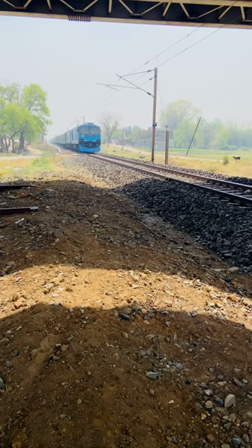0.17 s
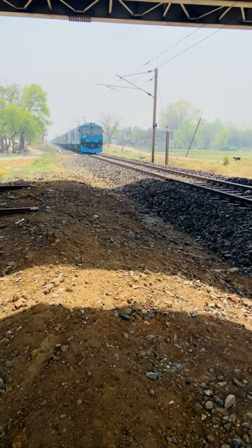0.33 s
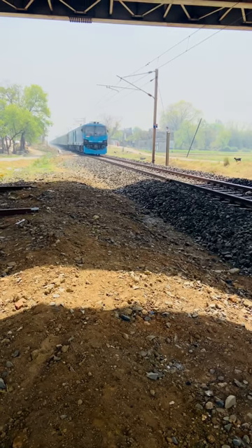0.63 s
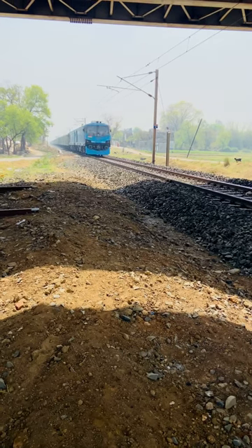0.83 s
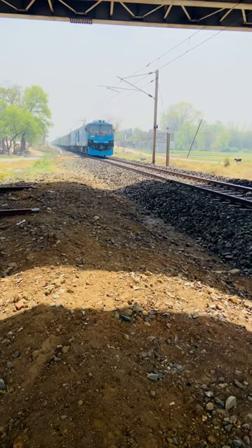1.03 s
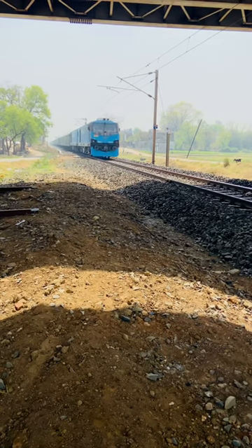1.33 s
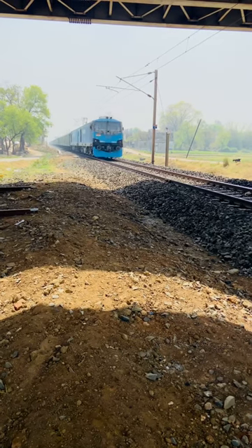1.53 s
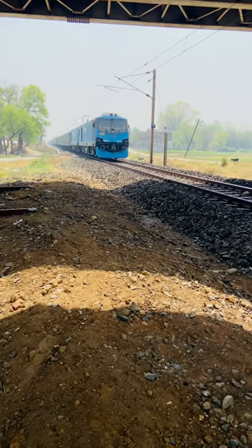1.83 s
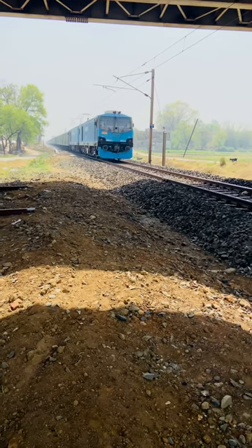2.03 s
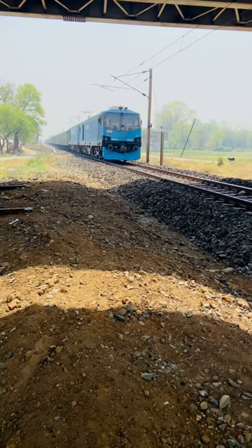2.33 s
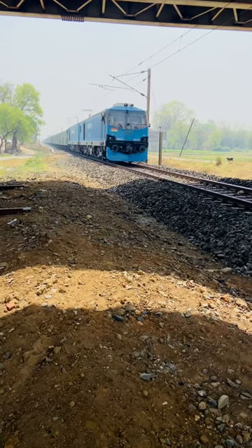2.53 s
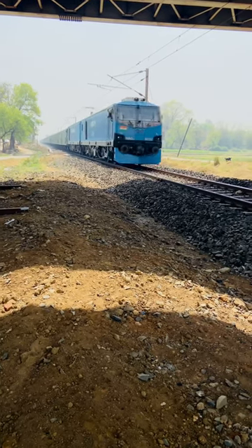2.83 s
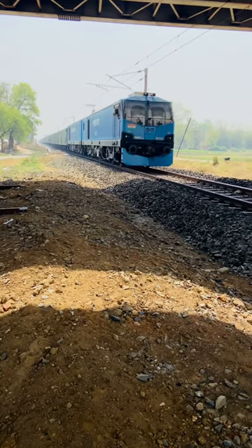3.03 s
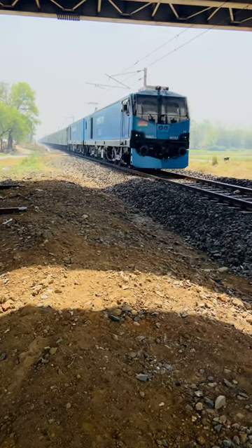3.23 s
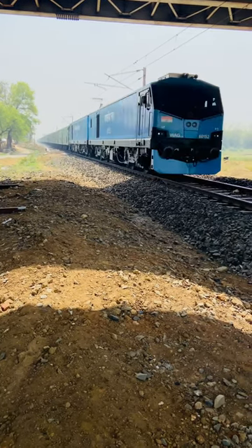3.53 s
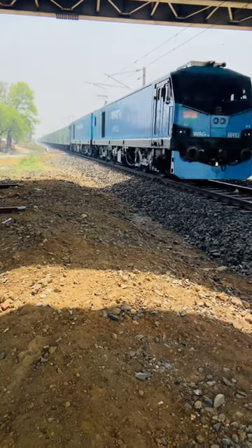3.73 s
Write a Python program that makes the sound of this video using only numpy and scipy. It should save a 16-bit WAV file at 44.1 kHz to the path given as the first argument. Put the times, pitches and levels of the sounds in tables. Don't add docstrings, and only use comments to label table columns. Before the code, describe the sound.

Electric freight train approaches, its low rumble, hum and wheel roar swelling to a close metallic bang.

```python
import sys
import numpy as np
from scipy import signal
from scipy.fft import rfft, irfft, next_fast_len
from scipy.io import wavfile
from scipy.ndimage import uniform_filter1d

SR = 44100
rng = np.random.default_rng(int(sys.argv[2]) if len(sys.argv) > 2 else 0)


def digitize_waveform(pressure):
    field = np.atleast_2d(pressure).T
    bounded = np.clip(field, -1, 1)
    quanta = np.round(bounded * 32767).astype(np.int16)
    wavfile.write(sys.argv[1], SR, quanta)


def boost(x):
    u = np.asarray(x, float) / 20
    return 10 ** u


N = 171549
T = np.arange(N) / SR
RING_SAMPLES = 8000


def evened(x):
    return x / np.sqrt(np.mean(x ** 2) + 1e-20)


def read(points, x, col=1):
    p = np.array(points, float)
    return np.interp(x, p[:, 0], p[:, col])


def readlog(points, hz):
    f, v = np.transpose(points)
    return np.interp(np.log(hz + 1), np.log(f + 1), v, left=v[0] - 30, right=v[-1] - 30)


def near(grow):
    # (time [s], level [dB])
    approach = [(0, -40.5), (.5, -36), (1.0, -33.5), (1.7, -31), (2.4, -29.5), (3.1, -26.5), (3.6, -23.5),
                (3.75, -20.5), (3.89, -19.5)]
    end_db = -22
    return boost(grow * (read(approach, T) - end_db))


def droop(grow):
    return 1 - 0.006 * near(grow)


def wash(shape, patch_db, flicker_db):
    frames, hz = N // 256 + 5, np.fft.rfftfreq(1024, 1 / SR)
    a, b, c, d, p = rng.standard_normal((frames, 513, 5)).T
    p = uniform_filter1d(p, size=10, axis=0)
    patches = evened(uniform_filter1d(p, size=12, axis=1))
    flicker = evened(uniform_filter1d(rng.standard_normal(frames), size=6))
    level_db = readlog(shape, hz)[:, None] + patch_db * patches + flicker_db * flicker
    z = np.array([a + 1j * b, c + 1j * d]) * boost(level_db)
    return evened(signal.istft(z, nperseg=1024, noverlap=768)[1][:, :N])


def fuzzy(hz, width_hz, clean=0):
    r = np.exp(-np.pi * abs(width_hz) * 1.5 * 32 / SR)
    slow_s = np.arange(N // 32 + 2) * 32 / SR
    shape = (2, len(slow_s) + 800)
    z = rng.standard_normal(shape) + 1j * rng.standard_normal(shape)
    z = signal.lfilter([1], [1, -2 * r, r * r], z)[:, 800:]
    z = z / abs(z) ** np.clip(clean, 0, 1)
    turn = np.exp(2j * np.pi * np.cumsum(hz * np.ones(N)) / SR)
    return evened(np.array([(np.interp(T, slow_s, v) * turn).real for v in z]))


def ring(hz, t60_s, rise_s):
    t = np.arange(RING_SAMPLES) / SR
    tone = np.sin(2 * np.pi * (hz * t + rng.random((2, 1))))
    return np.minimum(t / rise_s, 1) * boost(-60 * t / t60_s) * tone


def add(mix, s, sound):
    part = mix[:, round(s * SR):][:, :sound.shape[1]]
    part += sound[:, :part.shape[1]]


def hiss():
    # (frequency [Hz], density [dB per Hz])
    spectrum = [(4000, 2), (7000, -27), (11000, -2), (13500, -3), (15000, -32)]
    return boost(-56) * near(1.17) * wash(spectrum, patch_db=-3.5, flicker_db=0)


def bumps():
    # (time [s], level [dB], frequency [Hz])
    axle_loads = [(0.158, -26, 66.2), (0.41, -25.5, 78.1), (0.616, -33, 67.3), (0.918, -19.5, 154),
                  (1.181, -26, 150), (1.476, -30, 66), (1.708, -23, 68), (2.005, -19, 69.6),
                  (2.264, -28, 85), (3.549, -14, 207)]
    trim_db, cycles = -2.5, 4.15
    out = np.zeros((2, N))
    for s, db, hz in axle_loads:
        t = np.arange(0, cycles / hz, 1 / SR)
        swell = np.sin(np.pi * t * hz / cycles) ** 2
        tone = np.sin(2 * np.pi * (hz * t + rng.random((2, 1))))
        add(out, s, boost(db + trim_db) * swell * tone)
    return out


def rails():
    # (time [s], low tone level [dB], high tone level [dB])
    grip = [(0.0, -85, -70), (0.05, -48.5, -62), (0.43, -57, -47.5), (0.51, -52, -66), (0.71, -39, -57),
            (1.0, -48, -44.5), (1.96, -43, -52), (1.98, -46, -44), (2.43, -36.5, -47.5),
            (2.63, -48.5, -37.5), (2.76, -34, -49), (3.2, -36.5, -42.5), (3.24, -29, -43),
            (3.33, -46, -37.5), (3.73, -29.5, -47), (3.8, -41, -31), (3.86, -23.5, -53), (3.89, -42.5, -42)]
    pitch = droop(2.912)
    return sum(boost(read(grip, T, col=k)) * fuzzy(hz * pitch, 9.4, clean=0.5)
               for k, hz in enumerate((1757.5, 2041), 1))


def singing():
    # (frequency [Hz], width [Hz], level [dB])
    resonances = [(163.2, 22.4, -30.5), (195.1, 18.5, -32.5), (289.6, 22, -37), (405.5, 23.6, -35.5),
                  (486, 8.9, -40.5), (615, 8, -38.5), (655.4, 28, -39), (1014, 106, -33), (1729, 19, -40.5),
                  (2011, 80, -37), (2333, 17, -44), (2392, 36, -42.5), (2574, 14, -44), (3430, 50, -47.5),
                  (2794, 52, -45.5), (3026, 200, -46), (5250, 18, -58.5), (5300, 480, -51.5),
                  (6080, 100, -53.5)]
    pitch = droop(3.0)
    return near(1.004) * sum(boost(db) * fuzzy(hz * pitch, width_hz, clean=0.4)
                             for hz, width_hz, db in resonances)


def clink_modes(centre_hz):
    # (frequency [Hz], level [dB], t60 [s])
    wheel_modes = [(3050, 0, .15), (4250, 2, .09), (4925, 0.5, .25), (5190, -4, .15), (5990, -3, .3),
                   (7200, -4, .25), (8700, -3, .06), (9286, 0.5, .15), (9760, -6, .15), (10770, -2, .25),
                   (11300, -6, .12), (11880, -5, .15), (12500, -6, .1), (14800, -7, .1)]
    total = 0
    for hz, db, t60_s in wheel_modes:
        octaves = np.log2(hz / centre_hz)
        if abs(octaves) >= .28:
            continue
        focus_db = -13.0 * (octaves / 0.058) ** 2
        for ratio, split_db in ((.993, -11.5), (1, 7), (1.006, 2.5)):
            total = total + boost(db + split_db + focus_db) * ring(hz * ratio, t60_s, rise_s=0.0046)
    return total


def rattle(centre_hz, t60_s):
    t = np.arange(RING_SAMPLES) / SR
    spread = 1.216 ** np.sqrt(4000 / centre_hz)
    edges_hz = [centre_hz / spread, min(centre_hz * spread, 20000)]
    band = signal.butter(3, edges_hz, "band", fs=SR, output="sos")
    puff = evened(signal.sosfilt(band, rng.standard_normal((2, RING_SAMPLES))))
    fade = np.cos(np.pi / 2 * t / t[-1]) * boost(-60 * t / t60_s)
    grain = evened(uniform_filter1d(rng.standard_normal(RING_SAMPLES), size=100))
    return puff * np.minimum(t / .002, 1) * fade * boost(3 * grain)


def clinks():
    # (time [s], ring level [dB], centre [Hz], rattle level [dB], rattle t60 [s])
    blows = [(0.505, -70, 980, -36, .2), (0.61, -57, 4907, -59, 0.33), (0.613, -70, 3300, -52, .15),
             (0.634, -51, 6026, -53, 0.55), (.62, -45, 7030, -62, .3), (.69, -46, 7320, -68, .3),
             (0.719, -58, 11600, -74, .3), (0.829, -48, 4320, -59, 0.18), (0.849, -52, 3050, -52, .3),
             (.85, -61, 4930, -50, .3), (.855, -58, 10300, -68, .3), (1.482, -49, 4390, -47, 0.16),
             (1.481, -60, 3220, -43, .12), (1.51, -58, 4910, -48, 0.27), (1.495, -64, 10770, -78, .3),
             (1.70, -60, 5150, -56, .2), (1.73, -66, 10770, -76, .3), (2.2, -56, 5100, -51, .3),
             (2.249, -55, 5300, -43, 0.4), (2.251, -60, 2900, -40, 0.76), (2.25, -70, 2030, -32, 0.23),
             (2.472, -63, 4290, -52, 0.14), (3.525, -62.5, 8500, -50, 0.36), (3.64, -64, 15000, -64.5, .3),
             (3.674, -45, 9100, -44, .2), (3.68, -66, 12800, -61.5, .12), (3.711, -52, 9300, -35.5, 0.07),
             (3.711, -52, 15000, -44, .12), (3.716, -60, 890, -24, 0.51), (3.719, -60, 1650, -31.5, 0.39),
             (3.72, -60, 2720, -38.5, 0.74), (3.737, -42, 4306, -34.5, 0.56),
             (3.736, -39.5, 12000, -58, 0.16), (3.736, -50, 8500, -40.5, 0.2), (3.738, -50, 7400, -32, .2),
             (3.753, -29.5, 8980, -35.5, 0.58), (3.756, -34.5, 6040, -36, 0.36),
             (3.758, -58, 11400, -62, 0.18), (3.784, -37, 5230, -39, 0.42)]
    out = np.zeros((2, N))
    for s, ring_db, centre_hz, rattle_db, t60_s in blows:
        add(out, s, boost(ring_db) * clink_modes(centre_hz) + boost(rattle_db) * rattle(centre_hz, t60_s))
    return out


def thuds():
    # (time [s], level [dB], frequency [Hz], t60 [s])
    thud_modes = [
        (3.718, -13, 681, 0.08),
        (3.719, -14, 766, .06),
        (3.745, -17.5, 101, 0.26),
        (3.755, -17.5, 192, 0.17),
        (3.792, -14.5, 107, 0.46),
        (3.809, -13, 272, 0.14),
        (3.852, -19.5, 246, 0.28),
    ]
    out = np.zeros((2, N))
    for s, db, hz, t60_s in thud_modes:
        add(out, s, boost(db) * ring(hz, t60_s, rise_s=1.0 / hz))
    return out


def motors():
    # (time [s], low hum level [dB], middle hum level [dB], high hum level [dB])
    load = [(0, -60, -54, -68), (.2, -39, -64, -54), (.45, -49.5, -46, -52.5), (1.2, -39, -50, -49.5),
            (2.1, -40, -43, -42), (2.4, -43, -41, -45), (2.7, -31.5, -39.5, -40), (2.9, -34.5, -40, -41.5),
            (3.1, -33, -41, -33), (3.35, -36, -37.5, -38), (3.55, -34, -48, -35.5), (3.7, -33, -38, -34.5),
            (3.89, -33, -32, -31)]
    return sum(boost(read(load, T, col=k)) * fuzzy(hz, 10.6, clean=0.35)
               for k, hz in enumerate((337.5, 591, 681), 1))


def whine():
    # (time [s], pitch [Hz], level [dB])
    gear_mesh = [(0.0, 1003, -44.5), (0.16, 999.0, -47), (0.17, 1001, -43), (1.21, 1003, -36.5),
                 (1.78, 1004, -40.5), (3.01, 1009, -31), (3.22, 1007, -35.5), (3.24, 1009, -25),
                 (3.53, 1015, -32.5), (3.54, 1011, -39), (3.67, 1004, -29.5), (3.69, 1005, -48),
                 (3.74, 1003, -20), (3.77, 1003, -29), (3.78, 998.1, -48), (3.89, 1012, -26)]
    # (offset [Hz], level [dB])
    sidebands = [(-21, -12), (13, -7), (28.5, -15)]
    hz = read(gear_mesh, T)
    tone = fuzzy(hz, 4.97, clean=1.0)
    tone = tone + sum(boost(db) * fuzzy(hz + offset_hz, 2.45) for offset_hz, db in sidebands)
    return boost(read(gear_mesh, T, col=2)) * tone


def hum():
    return boost(-29) * near(0.32) * fuzzy(52.4, 14, clean=0.52)


def roar():
    # (frequency [Hz], density [dB per Hz])
    spectrum = [(400, -17.5), (700, -1), (1300, -3), (2400, -8), (3500, -15), (6000, -25), (12500, -41),
                (15000, -54)]
    return boost(-29) * near(0.86) * wash(spectrum, patch_db=1.36, flicker_db=.5)


def rumble():
    # (frequency [Hz], density [dB per Hz])
    spectrum = [(24, -36), (35, -14), (46, 3.5), (75, 0), (125, -7.5), (340, -9.5), (520, -17),
                (900, -26.5)]
    return boost(-22.5) * near(0.85) * wash(spectrum, patch_db=0.9, flicker_db=-1.06)


def rolling():
    top_cut = signal.butter(10, 13600, fs=SR, output="sos")
    return signal.sosfilt(top_cut, hiss() + hum() + roar() + rumble())


def ports(pair, focus=0):
    # (frequency [Hz], likeness [0-1])
    port_likeness = [(0, 1), (150, .995), (300, .97),
                     (400, 0.97), (600, 0.4), (2000, 0.53), (4300, 0.25), (5250, 0.72), (6000, 0.71), (7000, 1),
                (9000, 0.94), (13000, 0.8)]
    # (frequency [Hz], phase [rad])
    lag_rad = [(0, 0), (1500, 0), (2700, 1.9), (3800, 1.4), (5200, 0), (6300, 2.9), (8100, 3.45),
               (9700, 6.05), (11300, 6.5), (12500, 9.2), (14100, 9.5), (14700, 12.5)]
    # (frequency [Hz], level [dB])
    tilt_db = [(100, -0.8), (330, -2.5), (770, -1), (1200, -0.5), (2000, -0.5), (2700, 2.5), (4500, -1.5),
               (8000, -1.5)]
    size = next_fast_len(N + 4096)
    (a, b), hz = rfft(pair, size), np.fft.rfftfreq(size, 1 / SR)
    same = np.clip(read(port_likeness, hz), 0, 1)
    same = same + np.clip(focus, 0, 1) * (1 - same)
    tilt = boost(read(tilt_db, hz) / 2)
    right = (same * a + np.sqrt(1 - same ** 2) * b) * np.exp(-1j * read(lag_rad, hz))
    return irfft(np.array([a * tilt, right / tilt]), size)[:, :N]


def scene():
    spread = ports(bumps() + singing() + motors() + rolling())
    blows = ports(clinks() + thuds(), focus=.75)
    tones = ports(rails() + whine(), focus=0.57)
    return spread + blows + tones


def low_pass(x):
    return signal.sosfilt(signal.butter(12, 15800, fs=SR, output="sos"), x)


def record(dry):
    bass_cut = signal.butter(6, 43.4, "high", fs=SR, output="sos")
    mix = signal.sosfilt(bass_cut, dry)
    return low_pass(mix)


dry = scene()
out = record(dry)
digitize_waveform(out)
```